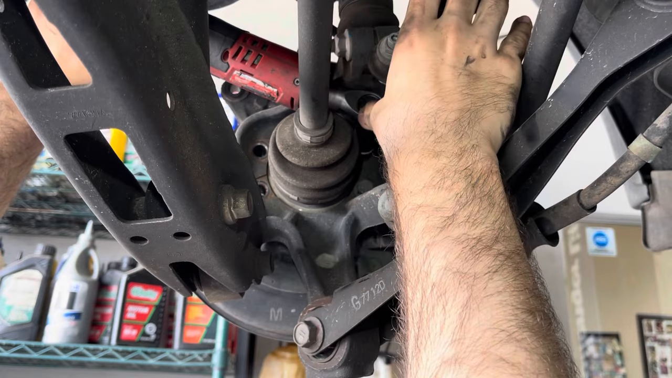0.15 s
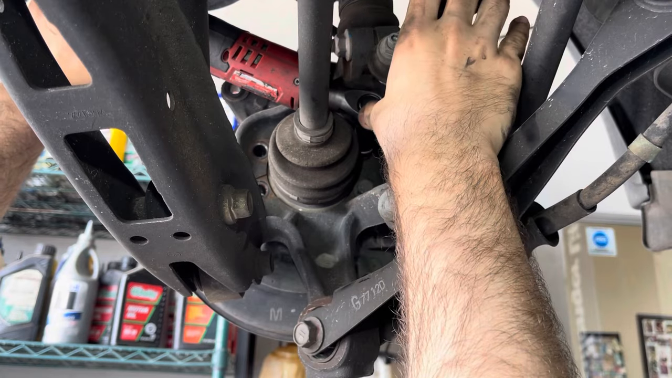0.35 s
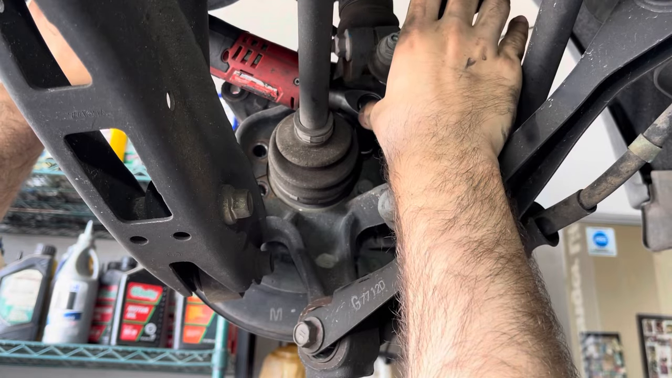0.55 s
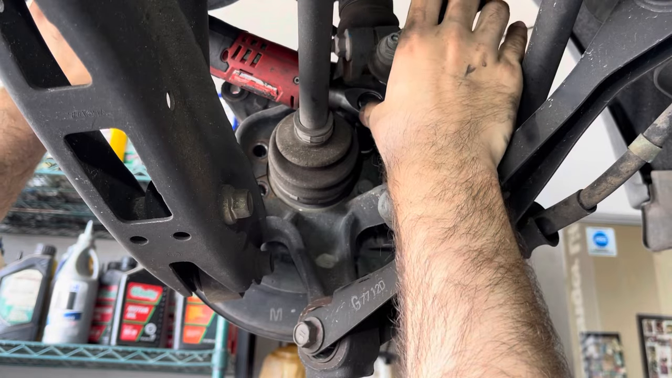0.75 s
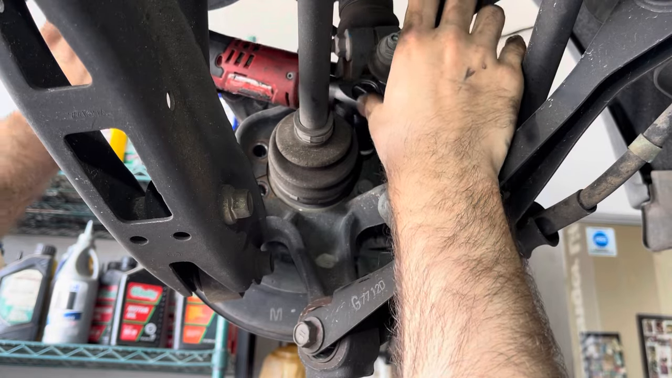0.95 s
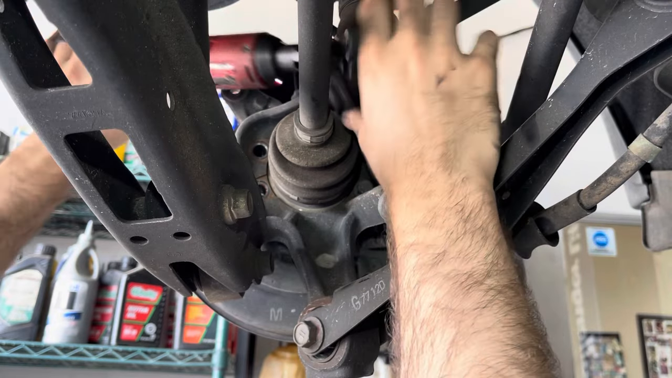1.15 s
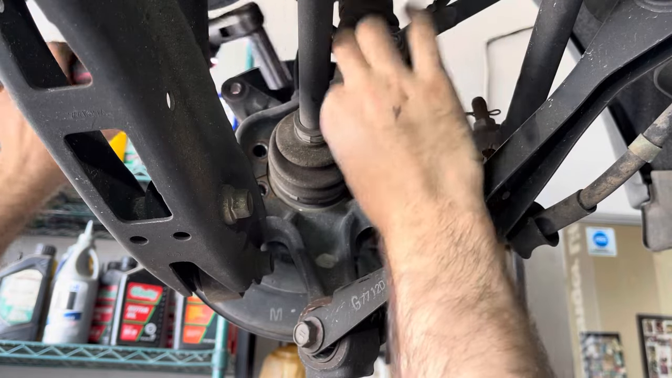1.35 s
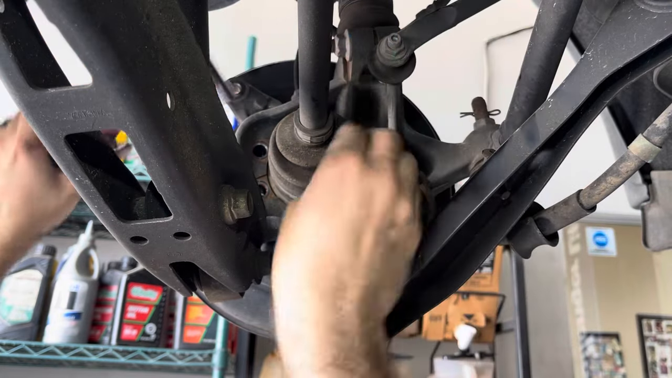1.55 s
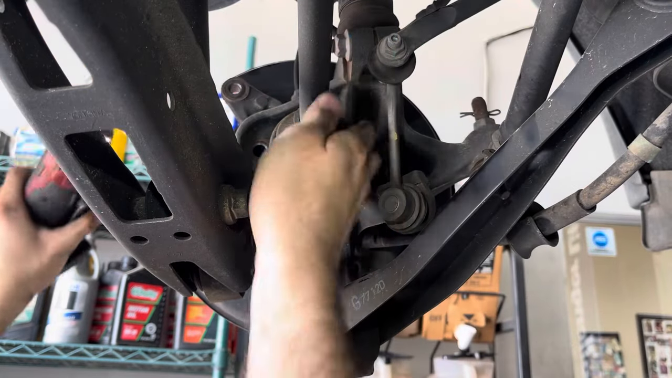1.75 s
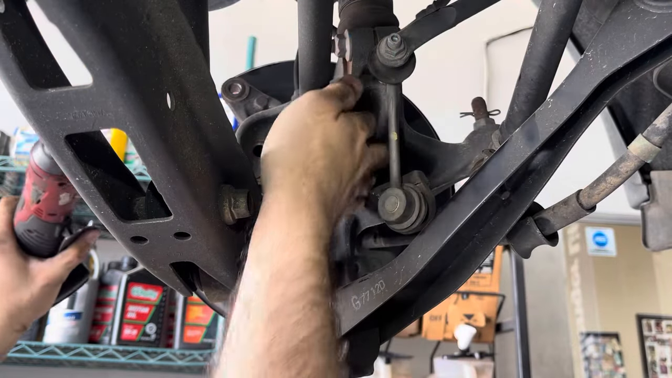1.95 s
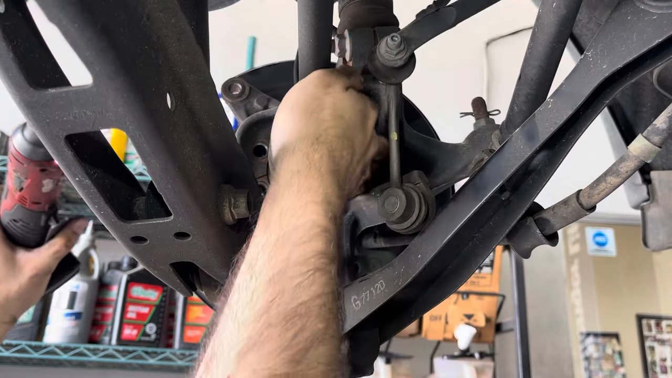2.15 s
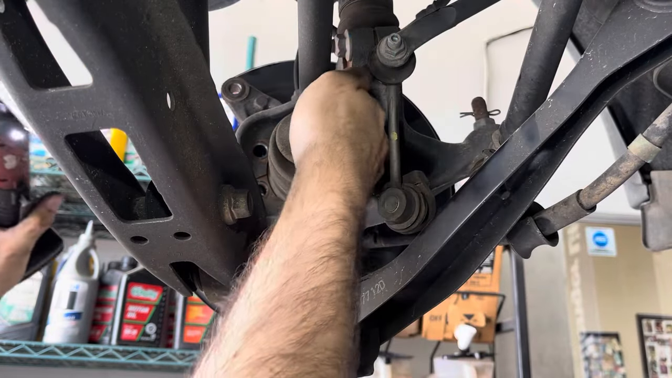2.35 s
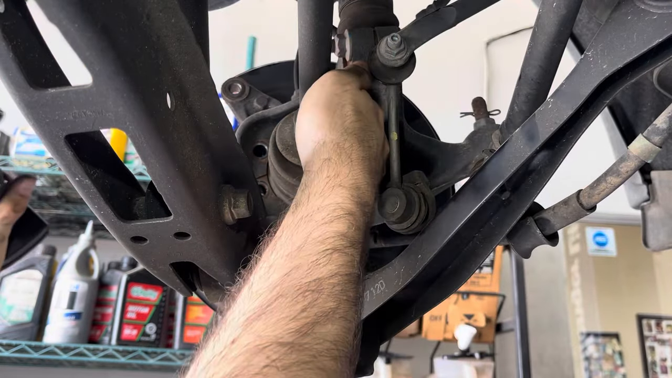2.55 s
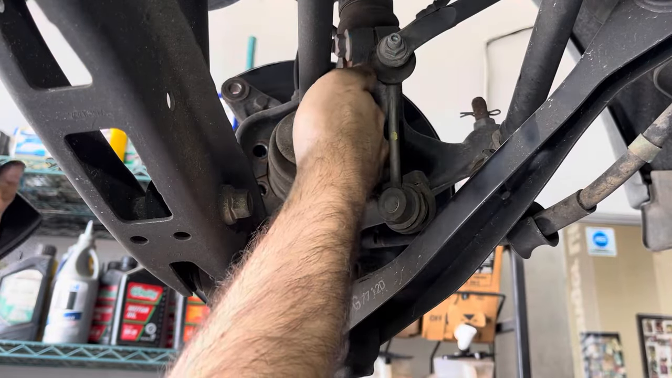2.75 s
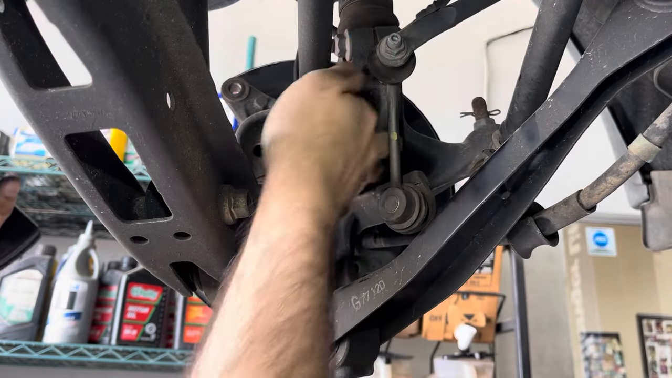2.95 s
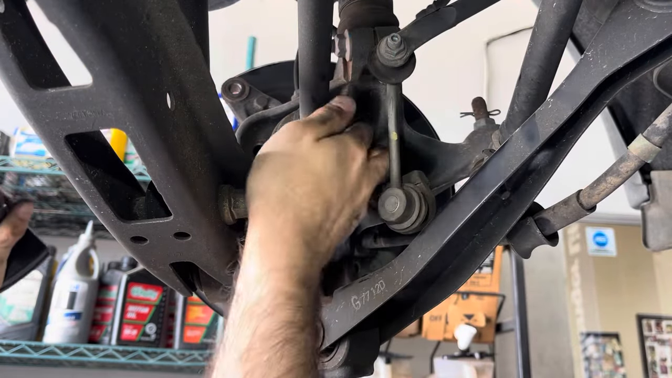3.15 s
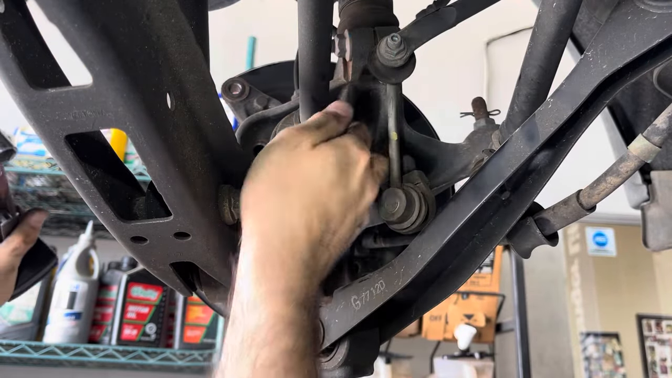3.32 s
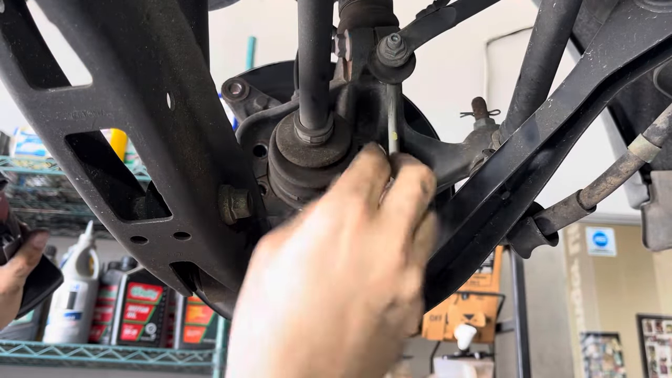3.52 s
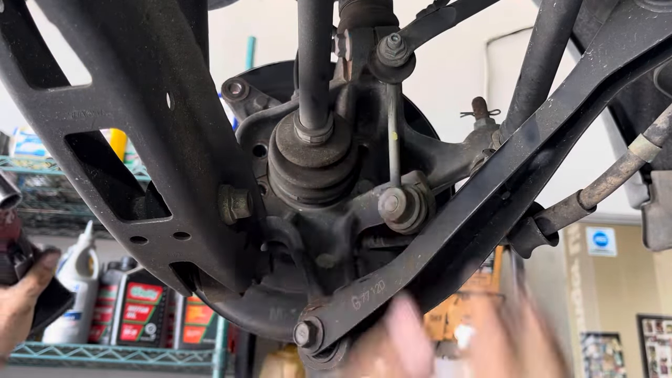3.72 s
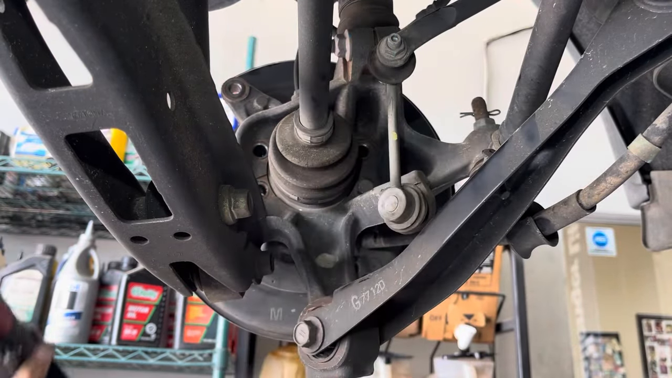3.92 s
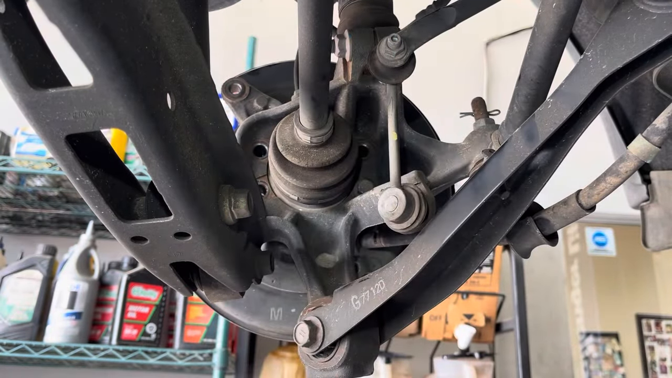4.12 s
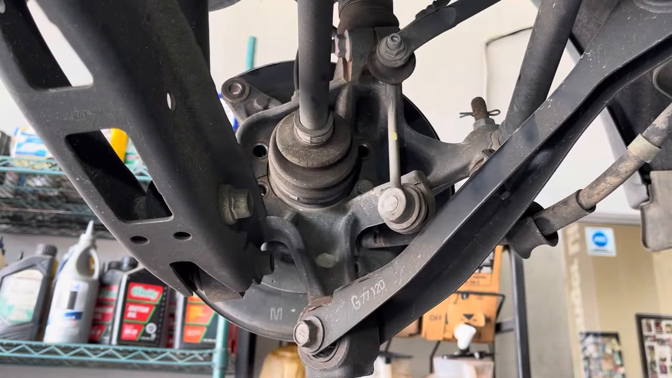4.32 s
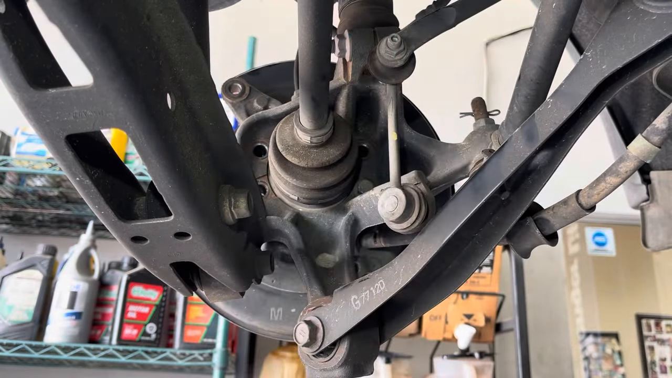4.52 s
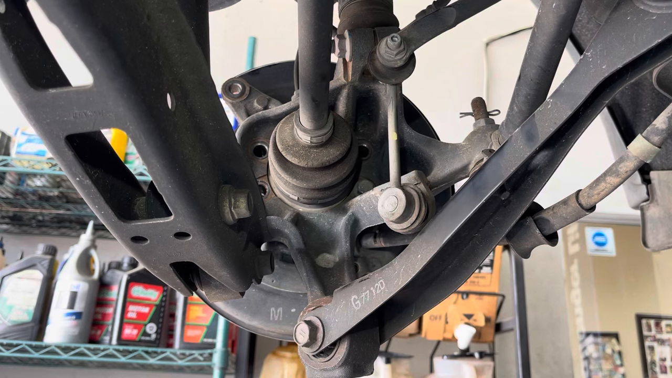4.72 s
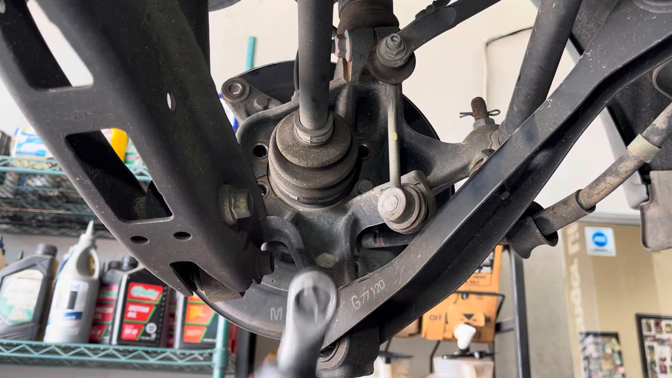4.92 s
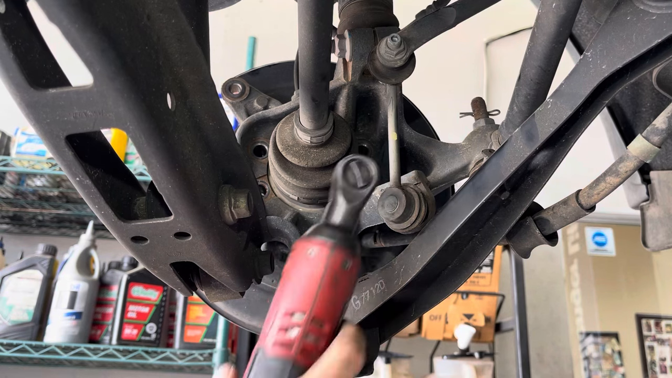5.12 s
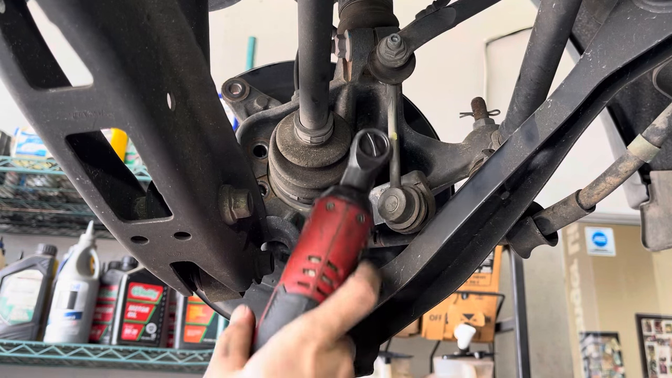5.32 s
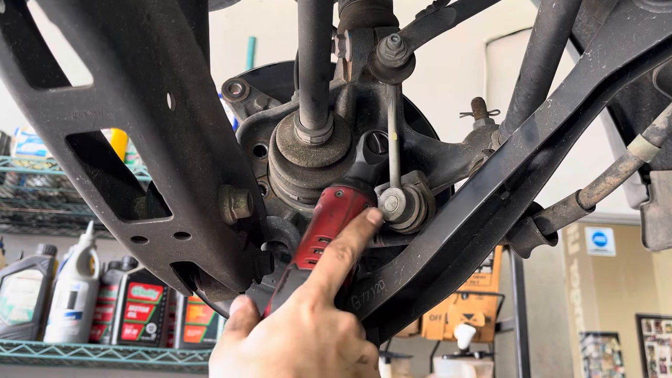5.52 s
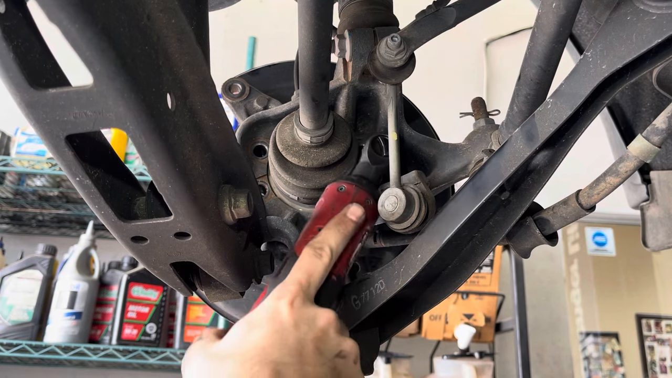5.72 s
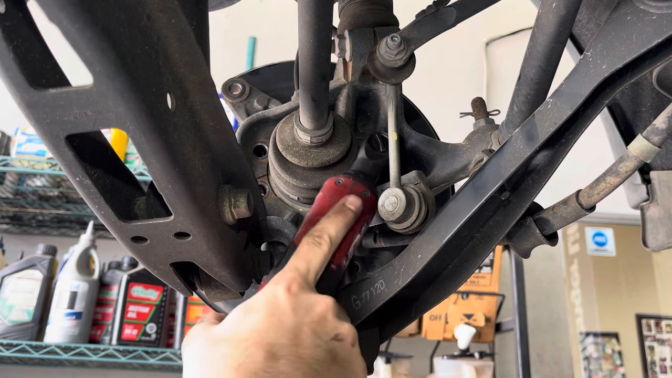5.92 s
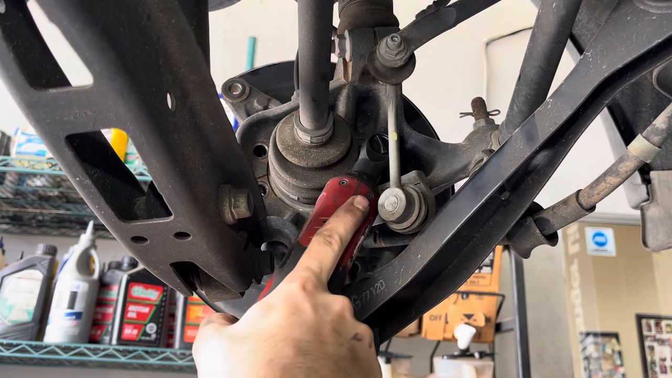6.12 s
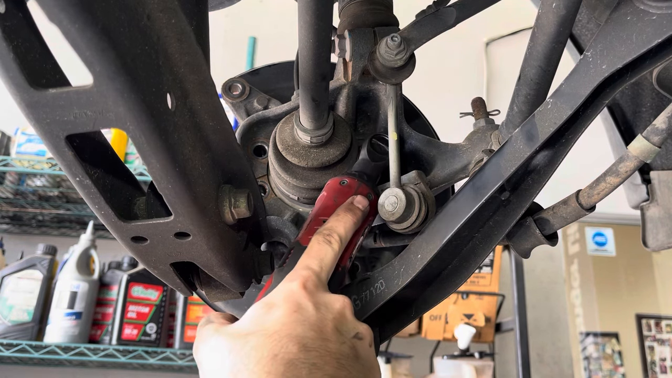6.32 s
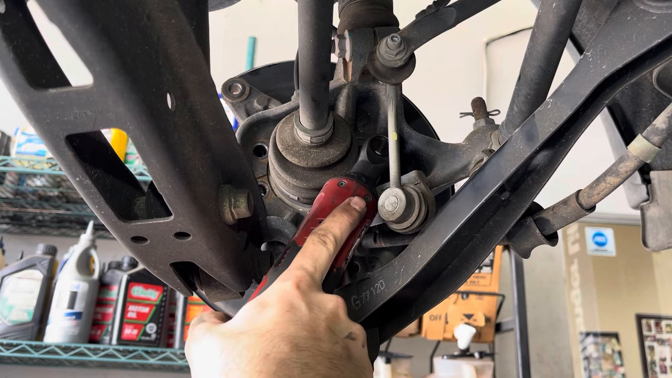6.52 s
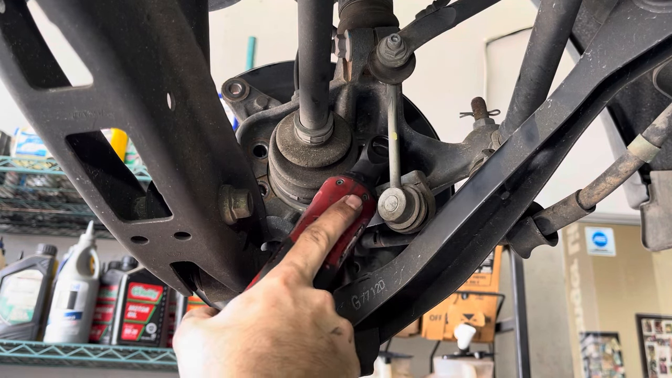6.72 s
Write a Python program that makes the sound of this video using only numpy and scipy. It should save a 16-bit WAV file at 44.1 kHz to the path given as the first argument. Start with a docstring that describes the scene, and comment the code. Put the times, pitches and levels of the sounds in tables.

```python
"""In a garage, a cordless ratchet backs a bolt out of a car's suspension, runs down and is pulled off.
The bolt is turned out by hand and laid aside, its loose washer singing high; the tool knocks onto the next bolt.
The tool is timed clacks, gritty gear noise and a ringing socket; touches are bursts of dying noise.
Steel parts and the washer are fading sine waves; pawl ticks and scraping threads are shaped noise.
Behind them the shop is filtered noise, with a far engine of two sines that slowly loses speed."""
import sys
import numpy as np
from scipy import signal
from scipy.fft import rfft, irfft, next_fast_len
from scipy.io import wavfile
from scipy.ndimage import uniform_filter1d

SR = 44100
rng = np.random.default_rng(int(sys.argv[2]) if len(sys.argv) > 2 else 0)


def wav_out(sig):
    """Save sig, one row per channel (or a flat mono array), as 16-bit PCM at SR to the path in sys.argv[1]."""
    wavfile.write(sys.argv[1], SR, np.round(np.clip(np.atleast_2d(sig).T, -1, 1) * 32767).astype(np.int16))


N = 298557

# Table levels are relative: most functions add their own level, and the room adds its echoes.
# Trigger held: pressed t/s, let go t/s, level/dB, pawl clacks over gear whirr level/dB,
# return contacts over driving contact level/dB, socket ring over the rest level/dB
TRIGGER_RUNS = [(-1, .7415, -23.5, -7, -0.5, -13), (6.245, 6.996, -20.5, -9, -8, -14.5)]
# Driving contact, then two return contacts, of one stroke: share of a turn
STROKE_CONTACTS = [0, .335, .655]
# Hum of the gears: multiple of the stroke rate, level/dB
GEAR_HUM = [(3, -30), (7, -31)]
# Tone colour of the tool on each bolt: f/Hz, level/dB (per Hz)
FIRST_BOLT_COLOUR = [(100, -34), (220, -8.5), (400, -12.5), (540, -10), (720, -6.5), (880, -5),
                     (1200, -13.5), (1750, -8), (2500, -10.5), (4150, -5), (4800, -7.5), (6800, -7),
                     (8300, 0.5), (10300, 5), (11200, 5), (12500, -2.5), (13800, -20)]
SECOND_BOLT_COLOUR = [(100, -29), (220, -15), (400, -12), (540, -5.5), (820, -8), (960, -1), (1400, -9),
                      (2200, -4), (2700, -7.5), (3700, -3.5), (7000, -7.5), (9100, 4), (10300, 5.5),
                      (11200, 1), (12600, -1.5), (13800, -21)]
# Ringing of the tool's steel head: f/Hz, level/dB, time to fall 60 dB t/s
HEAD_MODES = [(980, 1, 0.065), (2083, 5, 0.024), (3530, -1, 0.038), (4150, 0, 0.042), (4290, -8, 0.07),
              (7900, 2, 0.03), (9280, 4.5, 0.025)]
# The bolt comes loose and its washer rings with each stroke: from t/s, to t/s
LOOSE_SPAN = (.724, .945)

# Colour of the shop's rumble: f/Hz, level/dB (per Hz)
SHOP_COLOUR = [(25, -33.5), (50, 2), (75, 4), (115, 7.5), (190, -11), (300, -12.5), (430, -17.5),
               (950, -15.5), (1700, -23), (3000, -37.5), (5500, -47), (9000, -43), (11200, -51),
               (13000, -68)]
# Level of the shop's rumble: t/s, level/dB
SHOP_LEVEL = [(0, -42.5), (1.5, -42.5), (4.7, -43.5), (5.0, -40.5), (6.1, -39), (6.77, -41)]
# Pitch of the far engine: t/s, f/Hz
ENGINE_PITCH = [(0, 170), (1.7, 164), (2.6, 156), (3.1, 142.2), (3.7, 136.3), (6.77, 134.3)]
# How well the shop carries each pitch of the engine: f/Hz, level/dB
ENGINE_COLOUR = [(135, -47), (158, -49.5), (175, -78), (288, -69), (312, -80), (328, -53), (346, -65.5)]

# Touches that set the washer ringing, damped by whatever holds it: t/s, level/dB, time to fall 60 dB t/s
WASHER_TOUCHES = [(.597, -12.5, .03), (2.942, -42, .12), (3.045, -21, .25), (3.188, -32, .42),
                  (3.549, -43, .7), (3.866, -43, 1.0), (4.205, -19, .25), (4.268, -18.5, .85),
                  (4.522, -12.5, .35), (4.692, -29, .6)]
# Light steel parts touch: t/s, level/dB, bass against the middle level/dB, treble against it level/dB
TAPS = [(.651, -11.5, -11.5, 2), (.7025, -19, -15, 11), (0.7284, -15.5, -32, 5), (0.7407, -19, -20.5, 11),
        (1.2565, -32, -15.5, -10.5), (1.947, -33, -2.5, -7.5), (3.866, -36.5, -6.5, 10),
        (4.2034, -20, -2, 5), (4.2089, -10.5, -11.5, -2), (4.5163, -20.5, -15, -1.5),
        (4.7114, -34, -27.5, -10), (4.777, -41, -20, -7), (5.4734, -30.5, 2, -17),
        (5.4933, -30.5, -0.5, -12.5), (5.937, -30.5, 5.5, -6.5), (6.0645, -43, -0.5, -17),
        (6.153, -54.5, -3, 10), (6.2795, -32, -10.5, 5.5), (6.2906, -19.5, -3.5, 0.5),
        (6.364, -16, -20, 11), (6.524, -10.5, -22.5, 1), (6.758, -26.5, 3.5, 3)]
# Colour shared by all touches: f/Hz, level/dB (per Hz)
TAP_COLOUR = [(100, -7.5), (400, 5.5), (1000, 4), (3500, 1), (6500, 1), (8800, 7.5), (10300, 7.5),
              (11500, 8), (13000, -29.5), (16000, -26.5)]
# Pawl ticks as the tool is drawn off: t/s, level/dB
PAWL_TICKS = [(.971, -32.5), (.9902, -30), (1.0152, -25.5), (1.0205, -22), (1.034, -25), (1.0459, -18),
              (1.0613, -26.5), (1.0696, -26), (1.0748, -24), (1.1, -29.5), (1.106, -22), (1.1335, -30.5),
              (1.1395, -20), (1.1725, -29.5), (1.1783, -24.5), (1.1869, -26), (1.2048, -34.5),
              (1.2217, -21.5), (1.2654, -21.5), (1.2735, -26), (1.2873, -25), (1.313, -38), (1.327, -27),
              (1.3389, -37), (1.3585, -25.5), (1.4203, -29.5), (1.4402, -35.5)]
# Colour of the ticks: f/Hz, level/dB (per Hz)
TICK_COLOUR = [(1000, -15), (3000, -14), (4100, -6.5), (5000, -13), (7000, -13), (10000, 4.5), (12400, 5.5),
               (14000, -17.5), (16000, -16.5)]
# Loose teeth rattle between the ticks: from t/s, to t/s
RATTLE_SPAN = (.97, 1.45)

# The tool bumps the suspension: t/s, tap level/dB, bass level/dB, treble level/dB,
# thud level/dB, ring of the tool's head level/dB, favoured f/Hz
BUMPS = [(1.113, -20.5, 2, -21.5, -43.5, -41.5, 1800), (1.3649, -30, -6, 4, -47.5, -59, 3000),
         (5.2333, -20, -2.5, -2.5, -41, -46.5, 6000), (5.246, -41.5, -4.5, -14.5, -38, -59.5, 1002),
         (5.642, -24.5, 11, -4.5, -45, -37, 1200), (5.7826, -17, 1, -2, -48, -36.5, 2230),
         (5.9462, -33, 16, -8, -44, -36.5, 1600)]
# The suspension rings with each thud: f/Hz, level/dB, time to fall 60 dB t/s
SUSPENSION_MODES = [(142.8, -8.5, 0.4), (208, -3, 0.23), (262, -3.5, .16), (283, -8, 0.96),
                    (408, -9.5, 0.051), (931, -4, 0.21)]
# Fingers twist the bolt through its last threads: t/s, length t/s, level/dB
TWISTS = [(2.811, 0.063, -52.5), (3.106, 0.13, -57.5)]
# The freed bolt clicks in its hole: t/s, level/dB, bass against the middle level/dB,
# treble against it level/dB, ring level/dB, favoured f/Hz
BOLT_CLICKS = [(2.8203, -49, -10, -6.5, -52, 4170), (2.8602, -42, -10, -5.5, -51, 4170),
               (2.942, -24.5, 0, -3.5, -49, 4570), (3.044, -17, -6.5, -6.5, -35, 4170),
               (3.1021, -30, -13, -5, -44, 4600), (3.126, -37, -15, -9.5, -45, 4500),
               (3.182, -16.5, -1.5, -21.5, -37, 2600), (3.1899, -19, -17, 2.5, -36, 3300),
               (3.2344, -30, 1, -24.5, -42, 2500), (3.268, -33.5, -12, -15.5, -54.5, 4340),
               (3.3606, -29, -1.5, -13.5, -40.5, 3000)]
# Ringing of the bolt: f/Hz, level/dB, time to fall 60 dB t/s
BOLT_MODES = [(2280, -1, .025), (3410, 7.5, 0.047), (3880, -1, .045), (4434, -5, 0.086), (4880, 3, .045),
              (5850, -4, 0.047), (6410, -7, .04), (8700, 12.5, .035)]
# The bolt knocks the suspension arm: t/s, level/dB
ARM_KNOCKS = [(3.547, -27), (3.553, -47), (3.566, -45.5)]
# Ringing of the arm: f/Hz, level/dB, time to fall 60 dB t/s
ARM_MODES = [(219, -14.5, 0.57), (410, -21, 0.55), (580, -6.5, 0.09), (734, -10, 0.079),
             (1000, -17.5, 0.039), (1416, -2.5, 0.036), (1437, 3, 0.059), (1660, -2.5, 0.031),
             (1790, -5.5, 0.049), (2169, -12.5, 0.09), (2830, -8.5, 0.16), (2961, -11, 0.26),
             (3095, 2, 0.039), (3763, -9.5, 0.068), (4215, -15.5, 0.087), (5160, -20, 0.19),
             (5534, -17.5, 0.16), (6455, -18.5, 0.13)]
# The tool slides along the suspension: t/s, level/dB, time to fall 60 dB t/s
DRAG = (5.24, -33, 0.5)
# The motor whines as it starts: middle t/s, f/Hz, level/dB
WHINE = (6.245, 5480, -52)

# Phase lead of the left microphone port over the right: f/Hz, phase/rad
LEFT_LEAD = [(170, -.3), (280, .6), (600, 1.2), (1050, 1.1), (1900, -.3), (4500, -.65), (6900, -.4),
             (7600, -1.2), (8900, .4), (11200, 4.8), (12600, 7.1)]
# Left port minus right port: f/Hz, level/dB
PORT_BALANCE = [(60, 4), (110, -2), (155, -4), (250, 1), (600, -1.5), (1200, -7), (2400, -3), (5000, -5),
                (8100, -1.65), (11000, 0)]

FULL_STROKES_PER_S = 76.0
# gathers speed, coasts to rest, loses its drive
SPIN_UP_S, COAST_S, POWER_OFF_S = 0.078, 1.2, 0.028
LOUDNESS_POWER = 1.2  # amplitude goes as speed to this power
COAST_DB, COAST_CLACK_DB = -8.5, 3.5  # without drive: quieter, with clacks that stand out
LOOSE_DB, LOOSE_FADE_DB_PER_S = -16, 78
AWAY_S, AWAY_DB_PER_S = 1.1, 25  # the coasting tool is carried off
TEETH_PER_S = 13000  # at full speed
CLACK_T60_S, TICK_T60_S = .012, .013
WASHER_HZ = 11152
WASHER_CUT_S, WASHER_CUT_T60_S = 4.785, .03
RATTLE_PER_S, RATTLE_DB, RATTLE_FADE_DB_PER_S = 130, -22.5, 26.5  # rate at the start
TWIST_ATTACK_S, TWIST_T60_S = 0.032, 0.32
GARAGE_T60_S = 0.36
DIP_S, DIP_DB, DIP_WIDTH_S = 4.806, -24, .009
CUTOFF_HZ = 15900


def from_db(db):
    """Turn decibels into a gain."""
    return np.exp(np.log(10) / 20 * np.asarray(db))


def rms_one(x, weights=None):
    """Scale to an average strength (rms) of 1, judged where the weights are high."""
    power = np.average(np.abs(x) ** 2, weights=weights)
    return x / np.sqrt(power + 1e-20)


def in_time(rows):
    """Join the points of each column by straight lines, giving one curve per column."""
    s, *columns = np.transpose(rows)
    return [np.interp(np.arange(N) / SR, s, column) for column in columns]


def at_hz(points, hz):
    """Read a curve of (f/Hz, value) along a logarithmic frequency axis."""
    points = np.array(points)
    return np.interp(np.log(hz + 1), np.log(points[:, 0]), points[:, 1])


def during(span):
    """One within (from t/s, to t/s), zero outside."""
    t = np.arange(N) / SR
    return ((t >= span[0]) & (t < span[1])).astype(float)


def drift(rate_hz):
    """Slow random wandering of strength 1: noise smoothed by two equal low-pass stages."""
    step = 40  # samples between the slow values
    keep = np.exp(-2 * np.pi * step * rate_hz / SR)
    noise = rng.standard_normal(N // step + 2002)
    slow = signal.lfilter([1], [1, -2 * keep, keep * keep], noise)[2000:]  # skip the filter's start
    return np.interp(np.arange(N) / step, np.arange(len(slow)), rms_one(slow))


def convolve(x, response):
    """Start a copy of the response at every sample of x, keeping the length of x."""
    return signal.oaconvolve(np.float32(x), np.float32(response))[:len(x)].astype(float)


def colour(x, spectrum, size=4096):
    """Filter to a (f/Hz, level/dB) shape with minimum phase, so nothing sounds early."""
    gains = from_db(at_hz(spectrum, np.fft.rfftfreq(size, 1 / SR)))
    cepstrum = irfft(np.log(gains))
    # folding the cepstrum forward in time makes the phase minimal
    cepstrum[1:size // 2] *= 2
    cepstrum[size // 2 + 1:] = 0
    return convolve(x, irfft(np.exp(rfft(cepstrum))))


def fade(t, t60):
    """Exponential decay that falls 60 dB in t60 seconds."""
    return np.exp(-np.log(1000) * t / t60)


def burst(t60, size=4096):
    """Countless short modes struck at once: dying noise of unit energy."""
    dying = rng.standard_normal(size) * fade(np.arange(size) / SR, t60)
    return rms_one(dying) / np.sqrt(size)


def clicks(times, gains):
    """Blows one sample long."""
    at = np.clip(np.asarray(times) * SR, 0, N - 1).astype(int)
    return np.bincount(at, gains, N)


def grains(per_s):
    """Countless tiny impacts at random moments, scaled to unit power."""
    chance = np.clip(per_s / SR, .001, 1)
    return (rng.random(N) < chance) * rng.standard_normal(N) / np.sqrt(chance)


def modal(modes, size=16384):
    """One blow on a solid part: each of its modes is a sine that dies away."""
    t = np.arange(size) / SR
    return sum(rng.choice([-1, 1]) * from_db(db) * np.sin(2 * np.pi * hz * t) * fade(t, t60)
               for hz, db, t60 in modes)


def ring(x, modes):
    """Each blow in x sets the modes ringing."""
    return convolve(x, modal(modes))


def head_ring(x, ring_db=-51, wander_db=7.0, wander_rate_hz=5.2):
    """The tool's head rings along with x; its modes come and go as it rocks on the bolt."""
    ringing = 0
    for mode in HEAD_MODES:
        level = from_db(ring_db + wander_db * np.clip(drift(wander_rate_hz), -2, 2))
        ringing = ringing + level * ring(x, [mode])
    return x + ringing


def motor(on_s, off_s):
    """Shares of full speed and drive: a quick spin-up, then a long coast once the trigger is let go."""
    t = np.arange(N) / SR
    held, released = np.maximum(t - on_s, 0), np.maximum(t - off_s, 0)
    spin_up = 1 - np.exp(-(held / SPIN_UP_S) ** 2)
    coast = np.maximum(1 - released / COAST_S, 0) ** 2
    return spin_up * coast, np.exp(-released / POWER_OFF_S)


def ratchet(run, spectrum, jitter_s=0.00021, uneven_db=2.5, grain_db=2.0, snap_db=-8.0, socket_hz=11200,
            socket_t60=0.039, socket_rise_s=0.0008, loose_uneven_db=1.5, count=80):
    """The yoke swings once a turn: the pawl clacks three times over whirring gears, and the socket rings."""
    on_s, off_s, level_db, driven_clack_db, return_db, socket_db = run
    speed, drive = motor(on_s, off_s)
    t = np.arange(N) / SR
    short_t = t[:SR // 10]

    # turns are counted from the moment the drive ends, even if that is after the sound's end
    turns = FULL_STROKES_PER_S * np.cumsum(speed) / SR
    turns_still_to_come = FULL_STROKES_PER_S * max(off_s - t[-1], 0)
    turns = turns - np.interp(min(off_s, t[-1]), t, turns) - turns_still_to_come

    blows = 0
    for share, db in zip(STROKE_CONTACTS, (0, return_db, return_db)):
        at = np.arange(-count, count) + share
        slip, force = rng.standard_normal((2, len(at)))
        made = (at > turns[0]) & (at < turns[-1])
        gains = made * from_db(db + uneven_db * np.clip(force, -1.5, 1.5))
        blows = blows + clicks(np.interp(at, turns, t) + jitter_s * slip, gains)

    # every clack is a hard snap, then a quickly dying chatter of teeth
    clacks = rms_one(convolve(blows, fade(short_t, CLACK_T60_S)), speed)
    whirr = rms_one(from_db(grain_db * drift(170)))
    clack_gain = from_db(driven_clack_db + COAST_CLACK_DB * (0.5 - drive * speed))
    snaps = from_db(snap_db) * clack_gain * rms_one(blows, speed)
    chatter = np.hypot(clacks * clack_gain, whirr) * grains(TEETH_PER_S * speed)
    teeth = (snaps + chatter) / np.hypot(clack_gain, 1)
    body = rms_one(head_ring(colour(teeth, spectrum)), speed)

    hum = 0
    for multiple, db in GEAR_HUM:
        phase = 2 * np.pi * np.round(multiple) * turns + drift(5.4)
        hum = hum + from_db(db) * np.sqrt(2) * np.sin(phase)
    hum = drive * hum

    # the socket swells and dies after each driving clack
    strokes = np.arange(np.ceil(turns[0]), turns[-1])
    pushes = clicks(np.interp(strokes, turns, t), np.ones(len(strokes)))
    pushes = pushes * from_db(loose_uneven_db * drift(60))
    swell = 1 - np.exp(-(short_t / socket_rise_s) ** 2)
    swing = convolve(pushes, fade(short_t, socket_t60) * swell)
    socket = rms_one(swing * np.sin(2 * np.pi * socket_hz * t + drift(40)), speed)
    loose_db = LOOSE_DB - LOOSE_FADE_DB_PER_S * np.maximum(t - LOOSE_SPAN[0], 0)
    loose = from_db(loose_db) * uniform_filter1d(during(LOOSE_SPAN), size=200)  # soft edges

    loudness = speed ** LOUDNESS_POWER * from_db(level_db + COAST_DB * (1 - drive))
    return loudness * (body + hum + from_db(socket_db) * socket) + loose * socket


def shop(bass_width=0.56, air_width=0.67, waver_db=2.0, engine_db=-1):
    """Wide noise rumbles; a far engine's two lowest partials waver and slide through the shop's resonances."""
    mid, side = (rms_one(colour(rng.standard_normal(N), SHOP_COLOUR)) for _ in range(2))
    side = colour(side, [(120, 20 * np.log10(bass_width)), (600, 20 * np.log10(air_width))])
    rumble = from_db(in_time(SHOP_LEVEL)[0]) * np.array([mid + side, mid - side])
    hz, = in_time(ENGINE_PITCH)
    phase = 2 * np.pi * np.cumsum(hz * (1 + 0.005 * drift(5))) / SR
    hum = 0
    for k in (1, 2):
        db = at_hz(ENGINE_COLOUR, k * hz) + engine_db + waver_db * drift(14)
        hum = hum + from_db(db) * np.sqrt(2) * np.sin(k * phase)
    return rumble + hum * from_db([[-1.5], [1.5]])  # a little stronger on the right


def washer(level_db=9, wobble_rate_hz=18, wobble=0.56):
    """One high mode, renewed by each touch, beats as the washer rocks on the bolt; its ring is cut short."""
    t, swing = np.arange(N) / SR, np.zeros(N)
    for s, db, t60 in WASHER_TOUCHES:
        at = int(s * SR)
        swing[at:] = np.maximum(swing[at:], from_db(db + level_db) * fade(t[:N - at], t60))
    rise = np.hanning(SR // 170)  # softens each start
    swing = convolve(swing, rise / rise.sum())
    swing = swing * fade(np.maximum(t - WASHER_CUT_S, 0), WASHER_CUT_T60_S)
    # a complex wobble moves both strength and phase
    rocking = rms_one(1 + wobble * (drift(wobble_rate_hz) + 1j * drift(wobble_rate_hz)))
    return swing * np.real(rocking * np.exp(2j * np.pi * WASHER_HZ * t))


def taps(level_db=10, crack_t60=0.018, tail_db=-7, tail_t60=0.14, hang_db=-15, hang_t60=0.66, size=16384):
    """Each touch is a crack, a rough tail and a faint long hang of the heavy parts around it."""
    out = np.zeros(N + size)
    for s, db, bass_db, treble_db, *_ in list(TAPS) + list(BOLT_CLICKS) + list(BUMPS):
        crack = burst(crack_t60, size=size)
        tail = from_db(tail_db) * burst(tail_t60, size=size)
        hang = from_db(hang_db) * burst(hang_t60, size=size)
        tilt = [(1300, bass_db), (2800, 0.0072), (6500, 0.023), (8200, treble_db)]
        at = int(s * SR)
        out[at:at + size] += from_db(db + level_db) * colour(crack + tail + hang, tilt)
    return colour(out[:N], TAP_COLOUR)


def ticks(level_db=15, uneven_db=4):
    """The idle pawl drops over single teeth; a lighter rattle between them thins out as the tool slows."""
    s, db = np.transpose(PAWL_TICKS)
    start_s, end_s = RATTLE_SPAN
    age = np.maximum(np.arange(N) / SR - start_s, 0)
    per_s = RATTLE_PER_S * (1 - age / (end_s - start_s)) * during(RATTLE_SPAN)
    falls = rng.random(N) < per_s / SR
    rattle = falls * from_db(RATTLE_DB - RATTLE_FADE_DB_PER_S * age + uneven_db * rng.uniform(-0.9, 1, N))
    blows = clicks(s, from_db(db + level_db)) + rattle
    return head_ring(colour(convolve(blows, burst(TICK_T60_S)), TICK_COLOUR))


def struck(blows, modes, crack_db, crack_t60, crack_colour):
    """A blow on a heavy part rings its modes and makes a dull crack of dying noise."""
    s, db = np.transpose(blows)
    force = clicks(s, from_db(db))
    crack = colour(convolve(force, burst(crack_t60)), crack_colour)
    return ring(force, modes) + from_db(crack_db) * crack


def chimes(rows, modes, fall_db_per_octave, detune=0.0071):
    """A small part rings anew: the contact point favours modes near one pitch and shifts them a little."""
    out = np.zeros(N + SR)
    for s, *_, ring_db, favoured_hz in rows:
        shifted = []
        for hz, db, t60 in modes:
            distance = abs(np.log2(hz / favoured_hz))  # in octaves
            mode_hz = hz * (1 + detune * rng.uniform(-1, 1))
            shifted.append((mode_hz, ring_db + db - fall_db_per_octave * distance, t60))
        sound = modal(shifted)
        at = int(s * SR)
        out[at:at + len(sound)] += sound
    return out[:N]


def scrape(grain_db=3.5, grains_per_s=1500):
    """Dry threads rub with each twist of the bolt: gritty noise that rises, holds and dies away."""
    t = np.arange(N) / SR
    rub = 0
    for s, length_s, db in TWISTS:
        attack = np.clip((t - s) / TWIST_ATTACK_S + 1, 0, 1)
        release = fade(np.maximum(t - s - length_s, 0), TWIST_T60_S)
        rub = rub + from_db(db) * attack * release
    grit = grains(grains_per_s) * from_db(grain_db * drift(80))
    grit_colour = [(1000, -9.5), (4300, -5.5), (7000, -13.0), (10200, -13.0), (11300, 6.0), (12600, -43.5)]
    return rub * rms_one(colour(grit, grit_colour))


def drag():
    """The suspension rumbles as the tool slides along it: low noise that starts at once and dies away."""
    s, db, t60 = DRAG
    age = np.arange(N) / SR - s
    rumble_colour = [(50, -3.5), (120, 8), (180, -3.5), (240, -1), (350, -15.5),
                     (1000, -19.0), (4000, -36.5), (12000, -64.0)]
    rumble = rms_one(colour(rng.standard_normal(N), rumble_colour))
    return from_db(db) * (age > 0) * fade(np.maximum(age, 0), t60) * rumble


def whine(width_s=0.0092):
    """The windings sing as the trigger is first squeezed: a sine that swells and fades in an instant."""
    s, hz, db = WHINE
    t = np.arange(N) / SR
    return from_db(db) * np.exp(-((t - s) / width_s) ** 2) * np.sin(2 * np.pi * hz * t)


def garage(x, near_db, room_db, across_db, near_t60=0.12, top_db=-7, size=32768):
    """Direct sound, close echoes off the underbody and the room's tail; sideways echoes widen it."""
    wet = colour(x, [(6000, 0.0048), (11000, top_db)])  # echoes lose some treble
    wet = np.append(np.zeros(SR // 500), wet)[:N]  # and arrive 2 ms later
    side = convolve(wet, from_db(across_db) * burst(near_t60, size=size))
    echoes = []
    for _ in range(2):
        near = from_db(near_db) * burst(near_t60, size=size)
        room = from_db(room_db) * burst(GARAGE_T60_S, size=size)
        echoes.append(near + room)
    left = x + convolve(wet, echoes[0]) + side
    right = x + convolve(wet, echoes[1]) - side
    return np.array([left, right])


def ports(x):
    """The two microphone ports hear each pitch with their own level and phase."""
    size = next_fast_len(N + SR // 10)
    hz = np.fft.rfftfreq(size, 1 / SR)
    # each side takes half of the difference
    left = from_db(at_hz(PORT_BALANCE, hz) / 2) * np.exp(1j * at_hz(LEFT_LEAD, hz) / 2)
    return irfft(rfft(x, size) * np.array([left, 1 / left]), size)[:, :N]


def scene():
    """Tool, bolt and washer under the car, over the noise of the shop."""
    away = from_db(-AWAY_DB_PER_S * np.maximum(np.arange(N) / SR - AWAY_S, 0))
    tool = away * ratchet(TRIGGER_RUNS[0], FIRST_BOLT_COLOUR)
    tool = tool + ratchet(TRIGGER_RUNS[1], SECOND_BOLT_COLOUR) + whine()

    arm = struck(ARM_KNOCKS, ARM_MODES, crack_db=28, crack_t60=0.059,
                 crack_colour=[(300, -1.0), (1500, 7.5), (3500, -8), (8000, -22.5), (13000, -28.5)])
    thuds = [(s, thud_db) for s, _, _, _, thud_db, _, _ in BUMPS]
    suspension = struck(thuds, SUSPENSION_MODES, crack_db=38.0, crack_t60=0.014,
                        crack_colour=[(300, 3.0), (1200, -6.5), (3200, 0), (6000, -37), (13000, -30)])
    suspension = suspension + drag()
    bolt = chimes(BOLT_CLICKS, BOLT_MODES, fall_db_per_octave=22.5)
    bumped_head = chimes(BUMPS, HEAD_MODES, fall_db_per_octave=5.5)
    steel = taps() + bolt + bumped_head + arm + suspension + scrape()

    return (garage(tool, near_db=-11, room_db=-15.0, across_db=-8.5)
            + garage(ticks(), near_db=-9.5, room_db=-18.5, across_db=-13.5)
            + garage(steel, near_db=-3, room_db=-23.0, across_db=-16.0)
            + garage(washer(), near_db=-9.5, room_db=-16.5, across_db=-4)
            + shop())


def record(dry):
    """The two ports take the sound; the level dips once, briefly; the top is cut steeply."""
    t = np.arange(N) / SR
    dip = from_db(DIP_DB * np.exp(-((t - DIP_S) / DIP_WIDTH_S) ** 2))
    top_cut = signal.ellip(12, .1, 90, CUTOFF_HZ, fs=SR, output="sos")
    return signal.sosfilt(top_cut, ports(dry) * dip)


dry = scene()
out = record(dry)
wav_out(out)
```